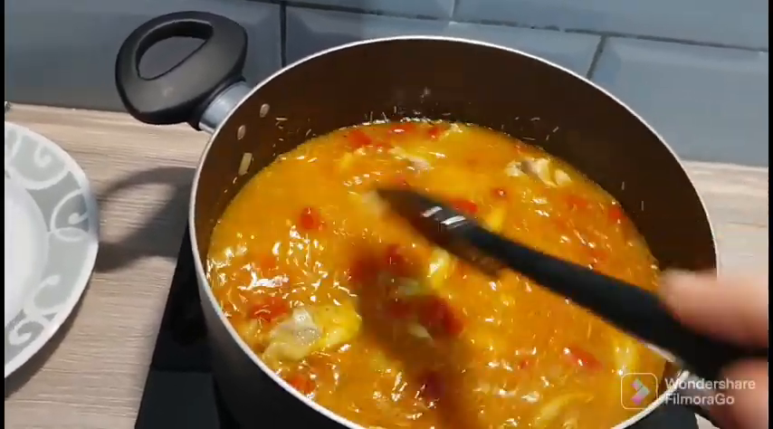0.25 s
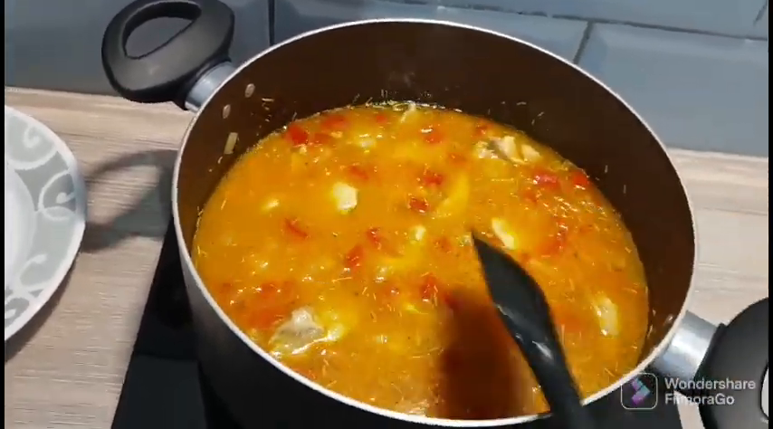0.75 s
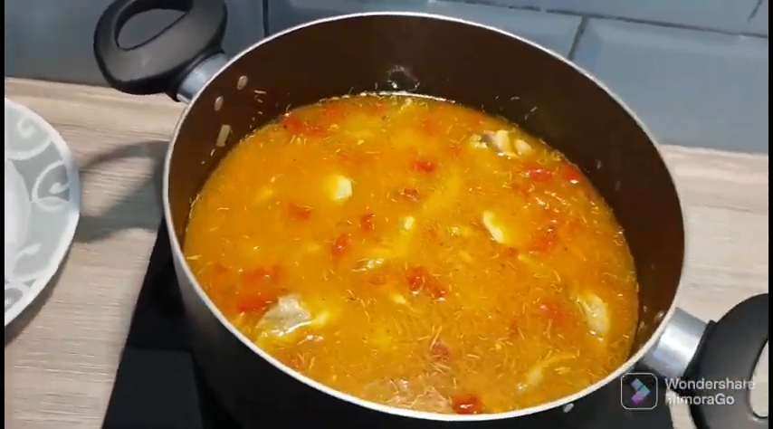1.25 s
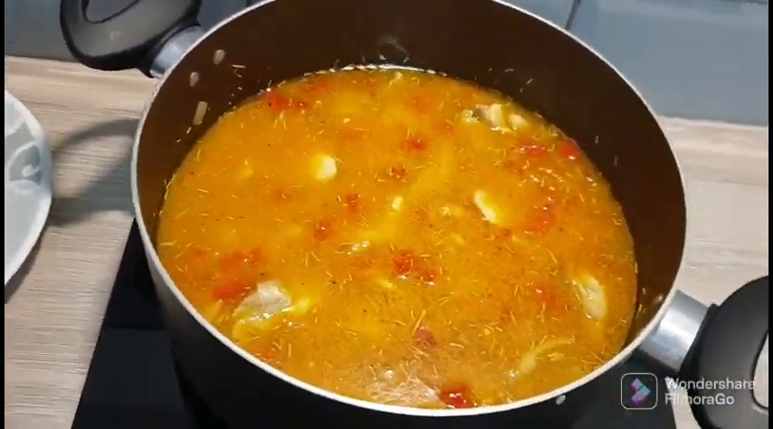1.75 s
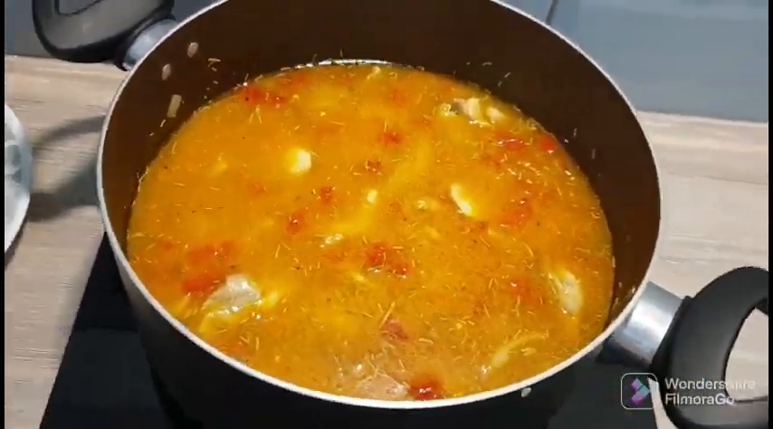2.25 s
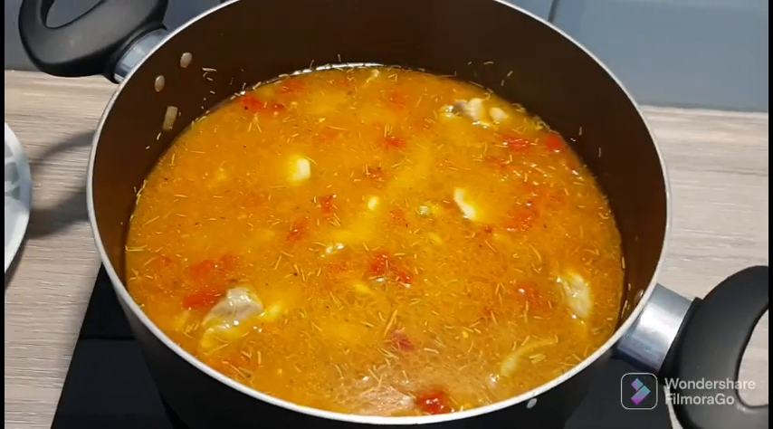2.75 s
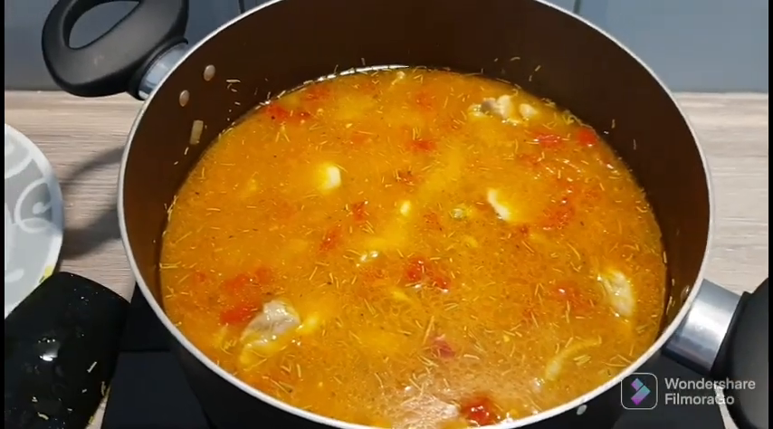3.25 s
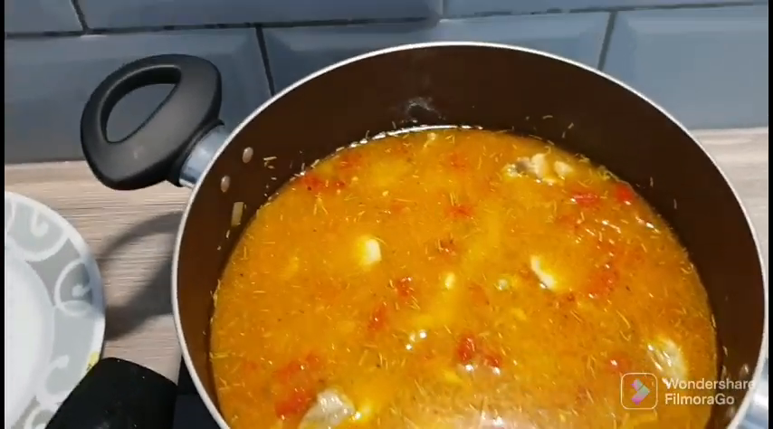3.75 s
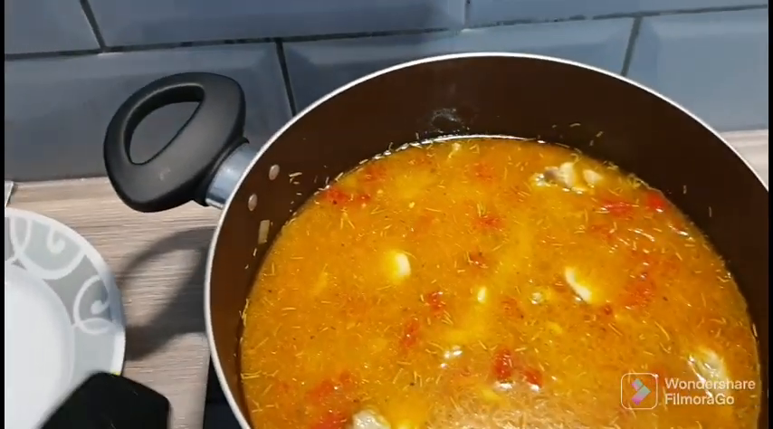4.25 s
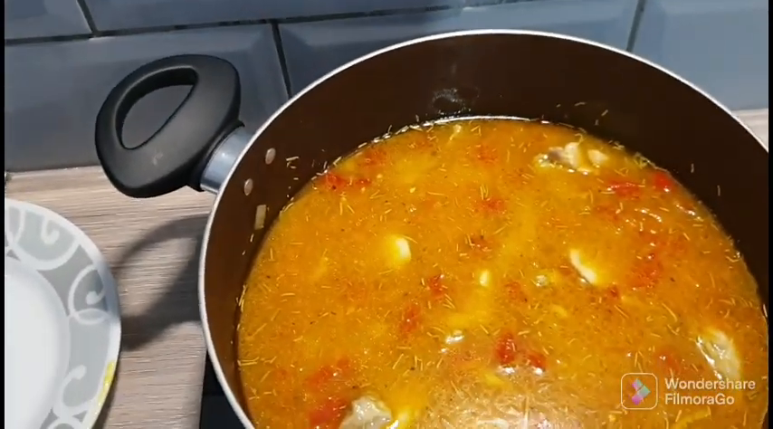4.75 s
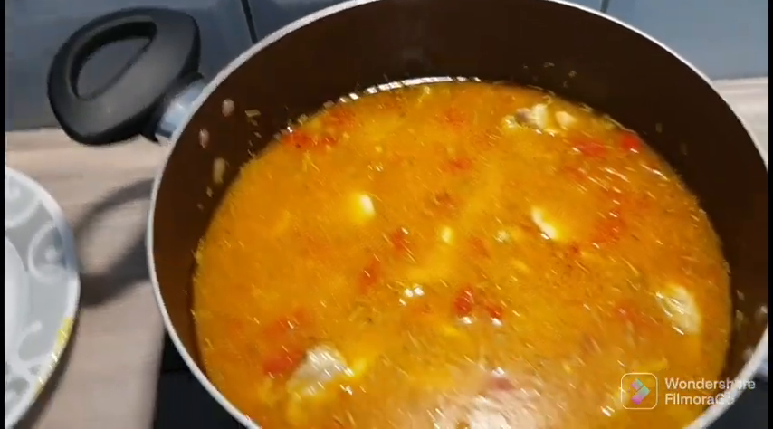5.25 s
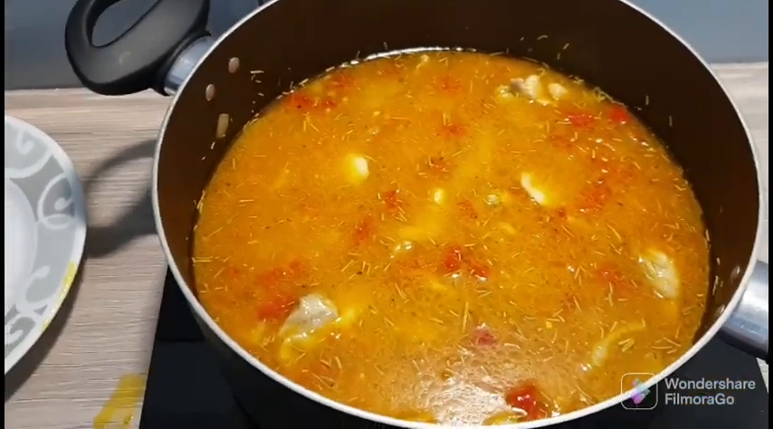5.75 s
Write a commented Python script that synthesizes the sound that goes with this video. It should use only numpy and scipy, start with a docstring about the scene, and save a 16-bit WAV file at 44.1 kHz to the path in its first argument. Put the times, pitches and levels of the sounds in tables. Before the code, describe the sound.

A spoon drips and thuds down, then a hard container knocks and clacks beside a pot of broth starting to simmer.

```python
"""Wet ticks and a drip sound as a plastic spoon leaves a pot of broth; two dull thuds follow as it is put down.
A hard container is knocked and shuffled beside the pot, then set down with two sharp clacks: each
impact excites the damped modes of the glass hob, the container, the pot and the worktop.
Meanwhile the rice and broth start to simmer, with a low rumble, collapsing bubbles and a faint hiss.
All is heard from close above, in a small tiled kitchen."""
import sys
import numpy as np
from scipy import signal
from scipy.fft import rfft, irfft, next_fast_len
from scipy.io import wavfile
from scipy.ndimage import map_coordinates

SR = 44100
rng = np.random.default_rng(int(sys.argv[2]) if len(sys.argv) > 2 else 0)


def waveform_to_disk(signal):
    """Save audio, clipped to [-1, 1], as 16-bit WAV at the path in sys.argv[1]."""
    frames = np.transpose(np.atleast_2d(signal))
    scaled = np.clip(frames, -1, 1) * 32767
    samples = np.round(scaled).astype(np.int16)
    wavfile.write(sys.argv[1], SR, samples)


N = 265014


# The container's contacts. Each row: start in seconds, level in dB, brightness in dB per octave,
# rise in seconds, level of the worktop's thump in dB, lead of that thump in seconds.
CONTACTS = [(1.579,-37.5,1.9,0.0059,-27,.005), (1.726,-43.5,-1,0.013,-51,0.0067),
            (1.736,-37.5,-2,0.0044,-32.5,.006), (2.057,-31.5,0.3,0.0025,-28.5,.004),
            (2.067,-28.5,0.44,0.0012,-47,0.0238), (2.137,-34,0.36,.001,-34.5,.007),
            (2.319,-38,-0.7,.0028,-35,.003), (2.367,-48.5,-1.5,0.0018,-41,0.016),
            (2.389,-47,-2.5,0.0019,-67,0), (2.414,-48.5,-3,0.00091,-37,0.022),
            (2.484,-44,-2.6,0.0038,-32,0.032), (2.528,-39,-1.4,0.00208,-35.5,0),
            (3.079,-42.5,-2.7,0.0082,-32.5,.02), (3.122,-35.5,-1,0.00039,-29.5,.003),
            (4.735,-21.5,1.7,0.0012,-18.5,.024), (4.82,-21.5,4.5,0.0007,-21.5,.017)]
# The noise of an impact. Each row: frequency in Hz, relative spectral level in dB.
CRACK_SPECTRUM = [(120, -45), (200, -7), (305, -5), (481, -3.5), (803, -2), (999, 0.5), (2150, -16.5),
                  (2450, -7), (3590, -26.5), (4730, -15.5), (5180, -20.5), (7330, -27), (7740, -32.5),
                  (12000, -28), (15800, -43)]
def knocks(crack_t60=.1, crack_db=-3, wall_db=-2, wall_hard_db=-9, graze_lead_s=.0046, graze_db=-20):
    """Impact excitation: each contact gives a broadband crack and sets the bodies it touches ringing."""
    out = np.zeros((2, N))
    for s, db, brightness, rise, _, _ in CONTACTS:
        hardness = hardness_of(db)
        ring = hob_and_container(hardness, rise)
        crack = unit(shaped_noise(SR, CRACK_SPECTRUM) * swell(rise, crack_t60))
        blow = voiced(ring + amp(crack_db) * crack, db, brightness)
        add(out, s, in_kitchen(blow, wet_db=-9))
        # after a hard blow the wall sings a little lower, and fainter beside the clack
        wall = pot_wall(pitch=1 - .11 * round(hardness))
        add(out, s, amp(db + wall_db + wall_hard_db * hardness) * wall)
        # a gentle contact touches lightly just before it seats
        add(out, s - graze_lead_s, (1 - hardness) * amp(graze_db) * blow.std() * crack)
    return out


def hardness_of(db, soft_db=-30.5, hard_db=-22.5):
    """Impact strength on a scale from 0 (soft) to 1 (hard)."""
    return np.interp(db, [soft_db, hard_db], [0, 1])


# Modes of the hob with the pot on it, and of the container.
# Each row: frequency in Hz, bandwidth in Hz, relative level in dB.
HOB_MODES = [(450.5, 100, 7), (1004.5, 53, 1), (1307, 17, -1), (1586, 19, -10), (2040, 8, -13.5),
             (2197, 33, -18.5), (2442, 45, -5), (2825, 120, -16.5), (2980, 36, -32), (4020, 260, -14),
             (4780, 60, -19.5), (5010, 72, -19.5), (5540, 39, -24), (5760, 110, -21), (6140, 72, -25.5),
             (6350, 84, -23.5), (7073, 45, -22.5), (7700, 49, -34), (8780, 32, -19.5), (9100, 110, -16.5),
             (11000, 91, -37), (11600, 190, -27.5), (13020, 63, -49), (14400, 43, -46)]
CONTAINER_MODES = [(463, 69, 2.5), (990, 28, 6.5), (1300, 40, 6.5), (1560, 55, 0.5), (1720, 33, -5.5),
                   (2420, 90, -0.5), (2620, 40, -3.5), (2960, 70, -14.5), (3540, 50, -19),
                   (3920, 110, -8.5), (4250, 60, -11.5), (4785, 45, -9), (4590, 45, -4), (5266, 44, -16.5),
                   (6460, 32, -10.5), (7150, 43, -13.5), (8930, 81, -11.5), (9750, 190, -14.5),
                   (10900, 76, -28.5), (11100, 28, -26.5), (11590, 60, -11.5), (12150, 67, -28.5),
                   (13100, 63, -25.5), (13900, 41, -30), (14600, 77, -25.5), (15600, 59, -26.5)]
def hob_and_container(hardness, rise):
    """Free vibration: soft blows ring the hob; in hard ones the container's ring takes over."""
    spot = [rng.normal(1, .008), 1, 1]  # the hob's pitch varies with the spot struck
    hob = unit(chatter(struck(HOB_MODES * np.array(spot), rise), gap_s=.004, fall_db=-5))
    container = unit(chatter(struck(CONTAINER_MODES, rise), gap_s=.003, fall_db=-4))
    return np.sqrt(1 - hardness) * hob + np.sqrt(hardness) * container


def struck(modes, rise):
    """Modal superposition: each mode is a damped sine that dies faster the wider its bandwidth."""
    hz, width, db = np.transpose(modes)[:, :, None]
    t = second()[:SR // 6]
    direction, strength, phase = rng.standard_normal((3, len(hz), 1))
    apart = np.sign(direction) * stereo_angle(hz)  # a mode reaches left and right out of step
    attack = 1 - np.exp(-t / max(rise, 1e-4))
    envelope = width * amp(db + 2 * strength) * np.exp(-np.pi * width * t) * attack
    angle = 2 * np.pi * (hz * t + phase)
    ring = np.array([(envelope * np.sin(angle + side * apart)).sum(0) for side in (1, -1)])
    return unit(np.pad(ring, [(0, 0), (0, SR - len(t))]))


def chatter(x, gap_s, fall_db):
    """Repeated contact: the rim of the base lands in three quick, uneven, weakening touches."""
    delays = np.cumsum([0, *rng.uniform(.5, 1.5, 2) * gap_s * SR]).astype(int)
    return sum(amp(k * fall_db) * np.pad(x, [(0, 0), (d, 0)])[:, :SR] for k, d in enumerate(delays))


# The bands of a blow. Each row: lower edge in Hz, upper edge in Hz.
BLOW_BANDS = [(200, 700), (700, 1800), (1800, 5500), (5500, 16000)]
# The balance of an untilted blow. Each entry: relative level of one band in dB.
BAND_DB = [-1, 0, -4.5, -19]
def voiced(x, db, brightness, pivot_hz=1470, contact_s=.03):
    """Spectral tilt: brightness shifts a blow's energy between the bands below and above a pivot."""
    centres = np.sqrt(np.prod(BLOW_BANDS, axis=1))
    target_db = db + np.array(BAND_DB) + brightness * np.log2(centres / pivot_hz)
    hz, power = signal.periodogram(x, SR)
    energy = np.array([power[:, (hz > lo) & (hz < hi)].mean(0).sum() for lo, hi in BLOW_BANDS])
    gains = np.column_stack([centres, target_db - 10 * np.log10(energy / contact_s)])
    return filtered(x, lambda f: amp(along(gains, f)))


# Modes of the pot's wall. Each row: frequency in Hz, relative level in dB, t60 in seconds.
WALL_MODES = [(409, -21, 1), (562, -20, 0.65), (1445, -20, .7), (2470, -14, 0.13), (2530, -16, 0.22),
              (2830, -27, 0.26), (3770, -27, 0.32)]
def pot_wall(pitch):
    """Beating: close pairs of modes make the pot's faint after-ring waver, differently at every blow."""
    ring = np.zeros((2, SR))
    for hz, db, t60 in WALL_MODES + WALL_MODES:
        strength, detune = amp(db - 3 + rng.normal(0, 2)), rng.normal(1, .007)
        cycles = pitch * detune * hz * second() + rng.random((2, 1))
        ring += strength * swell(.017, t60) * np.sin(2 * np.pi * cycles)
    return ring


WORKTOP_HZ, GIVE_S = 160.6, .011  # the worktop's pitch, and the base rise time of its swing
# Weight leaned on the worktop without a knock. Each row: start in seconds, level in dB, rise in seconds.
WORKTOP_PUSHES = [(2.26, -32.5, 0.018), (2.576, -38, .008), (4.96, -36, .012)]
def thumps(sag_hz=9.3, lead_share=.32):
    """Mass loading: the worktop gives just before each contact, and swings lower under a heavier load."""
    out = np.zeros((2, N))
    for s, db, _, _, thump_db, lead in CONTACTS:
        loaded_hz = WORKTOP_HZ - sag_hz * hardness_of(db)
        add(out, s - lead, thump(thump_db, loaded_hz, rise=GIVE_S + lead_share * lead))
    for s, db, rise in WORKTOP_PUSHES:
        add(out, s, thump(db, WORKTOP_HZ, rise))
    return out


# The worktop's low modes. Each row: multiple of the pitch, relative level in dB, t60 in seconds.
WORKTOP_MODES = [(.64, -13.5, 0.18), (1, 1, 0.13), (1.25, -15, .1), (1.581, -16.5, 0.062)]
# The dull part of a thump. Each row: frequency in Hz, relative spectral level in dB.
PUFF_SPECTRUM = [(25, -11), (45, 1), (90, -9), (200, -2), (300, -13), (600, -31.5), (2000, -82)]
def thump(db, hz, rise, puff_db=-13):
    """Damped plate vibration: the worktop swings briefly, with a dull puff from what stands on it."""
    swing = sum(amp(mode_db) * swell(rise, t60) * np.sin(2 * np.pi * ratio * hz * second())
                for ratio, mode_db, t60 in WORKTOP_MODES)
    puff = shaped_noise(SR, PUFF_SPECTRUM) * swell(rise, .091)
    return amp(db) * in_kitchen(swing + amp(puff_db) * puff, wet_db=-11.5)


# The spoon is put down. Each row: start in seconds, relative thud level in dB, relative scuff level in dB.
SPOON_THUDS = [(0.688, -7.5, -31), (.865, -13, -46.5)]
# Modes of the whole counter. Each row: frequency in Hz, relative level in dB, t60 in seconds.
COUNTER_MODES = [(38.37, -8.5, 0.71), (50.14, -21, 0.83), (75.8, -11, 0.68), (112.2, -0.5, 0.27),
                 (132.5, 2.5, 0.3), (161, -7.5, 0.27)]
# A thud's muffled knock and its scuff. Each row: frequency in Hz, relative spectral level in dB.
BODY_SPECTRUM = [(60, -6.5), (170, -3), (260, -11.5), (350, -11), (450, -6.5), (600, -16.5), (750, -18.5),
                 (1050, -23), (1400, -33.5), (1700, -49.5), (2500, -51), (6000, -71.5)]
SCUFF_SPECTRUM = [(300, -29.5), (1200, 0.5), (3700, -10.5), (5000, -26.5), (8000, -48), (16000, -36)]
def thuds(body_db=-12):
    """Soft impact: a slow, heavy contact drives the counter's low modes, with a knock and a slight scuff."""
    out, t = np.zeros((2, N)), second()
    for s, db, scuff_db in SPOON_THUDS:
        boom = sum(amp(level) * swell(.015, t60) * np.sin(2 * np.pi * hz * t)
                   for hz, level, t60 in COUNTER_MODES)
        body = shaped_noise(SR, BODY_SPECTRUM) * swell(.041, .14)
        add(out, s, amp(db - 10.5) * (boom + amp(body_db) * in_kitchen(body, wet_db=-12.5)))
        scuff = shaped_noise(SR, SCUFF_SPECTRUM) * swell(.067, .16)
        add(out, s + .012, amp(scuff_db - 24) * scuff)
    return out


# The container is dragged. Each row: start in seconds, length in seconds, relative level in dB.
DRAG_STROKES = [(1.484, .03, -61.5), (2.134, .19, -54), (2.334, 0.086, -48), (2.422, 0.074, -58),
                (2.881, 0.54, -65.5)]
def slide(attack_s=.02, release_s=.025, grain_db=4, rasp_db=-10, gain_db=-3, shudder_db=3):
    """Stick-slip friction: the dragged base rubs the hob's resonances and shakes the worktop."""
    t, stroke = np.arange(N) / SR, np.zeros(N)
    for s, length, db in DRAG_STROKES:
        attack = 1 - np.exp(-np.maximum(t - s, 0) / attack_s)
        release = np.exp(-np.maximum(t - s - length, 0) / release_s)
        stroke += amp(db) * attack * release
    grip = unit(amp(grain_db * wobble(180)))
    rub = unit(resonate(grip * noise(N), HOB_MODES))
    rasp = amp(rasp_db) * grip * shaped_noise(N, CRACK_SPECTRUM)
    shudder = amp(shudder_db) * shaped_noise(N, BODY_SPECTRUM)
    return in_kitchen(amp(gain_db) * stroke * (rub + rasp + shudder), wet_db=-5)


# Light scratches, and a faint breathy hiss after the last clack.
# Each row: start in seconds, level in dB, centre in Hz, rise in seconds, t60 in seconds.
SCRATCHES_AND_HISS = [(1.483, -66, 4480, 0.0374, .18), (2.89, -82, 3690, 0.3, .9),
                      (4.716, -41.5, 4516, 0.00054, .05), (5.235, -73, 4144, 0.17, .35)]
def scratches_and_hiss(skirt_db_per_octave=-7):
    """Band-pass noise: a thin scratch or hiss, fainter with each octave from its centre."""
    out = np.zeros((2, N))
    for s, db, centre_hz, rise, t60 in SCRATCHES_AND_HISS:
        band = noise(SR, lambda hz: skirt_db_per_octave * np.abs(np.log2((hz + 1) / centre_hz)))
        add(out, s, amp(db) * band * swell(rise, t60))
    return out


# The pot's high modes. Each row: frequency in Hz, level in dB, t60 in seconds.
CLINK_MODES = [(1510, -60.5, 0.29), (2460, -69, 0.16), (2915, -70.5, 0.37), (3848, -63.5, .3),
               (4880, -50, 0.013), (5720, -65, .1), (6600, -72, .1), (8500, -78, 0.22), (9600, -79, .1)]
# The tick of the touch. Each row: frequency in Hz, relative spectral level in dB.
TICK_SPECTRUM = [(300, -12.5), (1450, 6.5), (2200, -7.5), (4900, -14.5), (7000, -9.5), (10000, -17),
                 (13000, -32)]
def clink(start_s=4.341, tick_db=-50, thump_db=-44):
    """Impulse response: one light touch gives a tick and a slight thump, and the pot rings on thinly."""
    out, t = np.zeros((2, N)), second()
    ring = sum(amp(db) * swell(.00088, t60) * np.sin(2 * np.pi * (hz * t + rng.random((2, 1)) / 2))
               for hz, db, t60 in CLINK_MODES)
    tick = shaped_noise(SR, TICK_SPECTRUM) * swell(.0035, .047)
    add(out, start_s, in_kitchen(ring + amp(tick_db) * tick, wet_db=-3))
    add(out, start_s, thump(thump_db, WORKTOP_HZ, GIVE_S))
    return out


# Ticks and a drip. Each row: start in seconds, level in dB, pitch in Hz, width in octaves, t60 in seconds.
TICKS_AND_DRIP = [(0.075, -61.5, 6300, 1, 0.14), (0.14, -63.5, 4480, 0.77, 0.035),
                  (.21, -52.5, 1800, 0.093, 0.02), (.838, -74.5, 11170, 0.54, 0.038)]
def ticks_and_drip():
    """Short transients: wet ticks and a drip, then a faint high tick between the thuds."""
    out = np.zeros((2, N))
    for s, db, pitch_hz, octaves, t60 in TICKS_AND_DRIP:
        add(out, s, pop(db, pitch_hz, octaves, t60))
    return out


# Large bubbles in the thick broth. Each row: start in seconds, level in dB.
BURSTS = [(3.836, -54), (3.92, -56.5), (4.482, -51), (4.567, -51.5), (5.162, -53.5), (5.879, -57.5),
          (5.981, -63.5)]
def large_bubbles(pitch_hz=726, nudge_db=7.5, nudge_hz=150):
    """Bubble bursting: each one pops and nudges the pot into a low thump."""
    out = np.zeros((2, N))
    for s, db in BURSTS:
        add(out, s, pop(db, pitch_hz * rng.lognormal(0, .06), octaves=.37, t60=.1))
        add(out, s, thump(db + nudge_db, nudge_hz, GIVE_S))
    return out


def pop(db, pitch_hz, octaves, t60):
    """Band-limited transient: a short burst of noise around one pitch is heard as a pop or tick."""
    burst = noise(SR, lambda hz: -50 * np.log10(1 + (np.log2((hz + 1) / pitch_hz) / (2 * octaves)) ** 2))
    return in_kitchen(amp(db) * burst * swell(.00071, t60), wet_db=-4.5)


# The strength of the simmer. Each row: time in seconds, relative level in dB.
SIMMER_STRENGTH = [(0, -90), (1.9, -79.5), (2.8, -79.5), (4.5, -61), (5.3, -62.5), (6, -69)]
# The pot's rumble, small bubbles and hiss. Each row: frequency in Hz, relative spectral level in dB.
RUMBLE_SPECTRUM = [(20, -23.5), (30, -5), (42, 4), (58, 4.5), (72, -5.5), (92, -17), (125, -5),
                   (140, -12.5), (165, -3.5), (190, -28.5), (230, -34), (330, -38.5), (600, -68.5)]
BUBBLE_SPECTRUM = [(130, -33), (220, 0.5), (549, -2.5), (713, 1), (872, -6.5), (961, -3.5), (1050, -10.5),
                   (1500, -22), (2200, -21.5), (2860, -51), (4840, -120)]
HISS_SPECTRUM = [(880, -26), (1500, 4.5), (2180, -8.5), (2500, 1.5), (3140, -2), (3900, -0.5), (6080, -9.5),
                 (7550, -9.5), (8410, -6), (9370, -5), (10500, -6.5), (13800, -4.5), (15800, -12)]
def simmer(rumble_db=-54, bubble_db=-1, hiss_db=-78.5, hiss_growth=.22):
    """Bubble collapse: as the rumbling pot heats, small bubbles cave in under the rice and a hiss grows."""
    heat_db = np.interp(np.arange(N) / SR, *np.transpose(SIMMER_STRENGTH))
    rumble = amp(rumble_db + 2 * wobble(10)) * shaped_noise(N, RUMBLE_SPECTRUM)
    clumps = unit(amp(2.5 * wobble(7) + 2 * wobble(90)))
    bubbles = amp(heat_db + bubble_db) * clumps * shaped_noise(N, BUBBLE_SPECTRUM)
    hiss = amp(hiss_db + hiss_growth * (heat_db - heat_db.mean())) * shaped_noise(N, HISS_SPECTRUM)
    return rumble + bubbles + hiss


# The kitchen's reverberation time. Each row: frequency in Hz, t60 in seconds.
KITCHEN_T60 = [(150, 0.46), (500, 0.32), (1200, 0.25), (4000, 0.22), (12000, 0.15)]
def in_kitchen(x, wet_db):
    """Reverberation: the tiled room adds a diffuse tail, which dies faster in the treble."""
    hz, t, spectra = signal.stft(noise(SR * 3 // 4), SR, nperseg=256)
    envelope = amp(-60 * t / along(KITCHEN_T60, hz)[:, None]) * (1 - np.exp(-t / .0021))
    tail = signal.istft(spectra * envelope, SR, nperseg=256)[1]
    wet = signal.fftconvolve(x, tail / np.linalg.norm(tail[0]), axes=1)
    return x + amp(wet_db) * wet[:, :x.shape[-1]]


# The quiet kitchen. Each row: frequency in Hz, relative spectral level in dB.
HUSH_SPECTRUM = [(150, -32), (250, 3.5), (618, -8), (1230, -8.5), (1490, -15), (1950, -12.5), (2500, -11.5),
                 (3250, -40), (5500, -120)]
def room_tone(db=-78):
    """Stationary noise: the steady hush of the kitchen."""
    return amp(db) * shaped_noise(N, HUSH_SPECTRUM)


# The likeness of the two channels. Each row: frequency in Hz, left-right correlation.
CORRELATION = [(140, 0.95), (400, .7), (1000, 0.21), (2500, -0.15), (4600, 0.14), (8000, -0.11),
               (14000, 0.17)]
def stereo_angle(hz):
    """Spatial coherence: half the phase angle between left and right, small in the bass."""
    return np.arccos(np.clip(along(CORRELATION, hz), -1, 1)) / 2


def noise(n, colour=lambda hz: 0):
    """Partly coherent stereo noise of rms 1, coloured in dB: alike in the bass, unrelated in the treble."""
    def response(hz):
        angle = stereo_angle(hz)
        return amp(colour(hz)) * np.array([np.cos(angle), np.sin(angle)])
    mid, side = filtered(rng.standard_normal((2, n)), response)
    return unit(np.array([mid + side, mid - side]))


def shaped_noise(n, spectrum):
    """Stereo noise whose spectral envelope follows (Hz, dB) points."""
    return noise(n, lambda hz: along(spectrum, hz))


def resonate(x, modes):
    """Forced vibration: x drives parallel (Hz, bandwidth, dB) resonances of alternating sign."""
    return filtered(x, lambda f: sum((-1) ** k * amp(db) * 1j * f * width / (hz**2 - f**2 + 1j * f * width)
                                     for k, (hz, width, db) in enumerate(modes)))


def filtered(x, response):
    """Linear filtering: the spectrum of x times a complex response of frequency."""
    n = x.shape[-1]
    padded = next_fast_len(n + SR // 5)
    return irfft(rfft(x, padded) * response(np.fft.rfftfreq(padded, 1 / SR)), padded)[..., :n]


def swell(rise, t60):
    """Exponential rise and decay, of height 1; the decay loses 60 dB in t60 seconds."""
    t = second()
    shape = (1 - np.exp(-t / max(rise, 1e-4))) * amp(-60 * t / t60)
    return shape / shape.max()


def wobble(rate):
    """A smooth random curve with rate knots a second."""
    return map_coordinates(rng.standard_normal(int(N * rate / SR) + 4), [np.arange(N) * rate / SR])


def along(points, hz):
    """Interpolate (Hz, value) points on a log frequency axis."""
    knots_hz, values = np.transpose(points)
    return np.interp(np.log(hz + 1), np.log(knots_hz + 1), values)


def amp(db):
    """Decibels to gain."""
    return 10 ** (np.asarray(db) / 20)


def unit(x):
    """Scale to rms 1."""
    return x / np.sqrt(np.mean(x ** 2) + 1e-20)


def second():
    """The one-second time axis of an event."""
    return np.arange(SR) / SR


def add(track, s, sound):
    """Mix a sound into the track at s seconds."""
    part = track[:, round(s * SR):][:, :sound.shape[-1]]
    part += sound[..., :part.shape[-1]]


# The balance of the handling sounds. Each row: frequency in Hz, left minus right level in dB.
LEFT_BIAS = [(150, -1.5), (450, 0.5), (1100, -1.5), (2400, 6), (8000, 1.5), (14000, 2.5)]
def scene():
    """Superposition of all sources; the handling happens left of the pot, so its treble leans left."""
    handling = knocks() + clink() + scratches_and_hiss() + thumps() + thuds() + slide()
    placed = filtered(handling, lambda hz: amp(np.outer([.5, -.5], along(LEFT_BIAS, hz))))
    return placed + ticks_and_drip() + large_bubbles() + simmer() + room_tone()


def record(dry, low_hz=30, top_hz=15900, ceiling=.9):
    """Band limiting and saturation: the deepest bass and top treble go, and the highest peaks are rounded."""
    thinned = signal.sosfilt(signal.butter(4, low_hz, "highpass", fs=SR, output="sos"), dry)
    rounded = thinned / (1 + np.abs(thinned / ceiling) ** 8) ** (1 / 8)
    return filtered(rounded, lambda hz: hz < top_hz)


dry = scene()
out = record(dry)
waveform_to_disk(out)
```